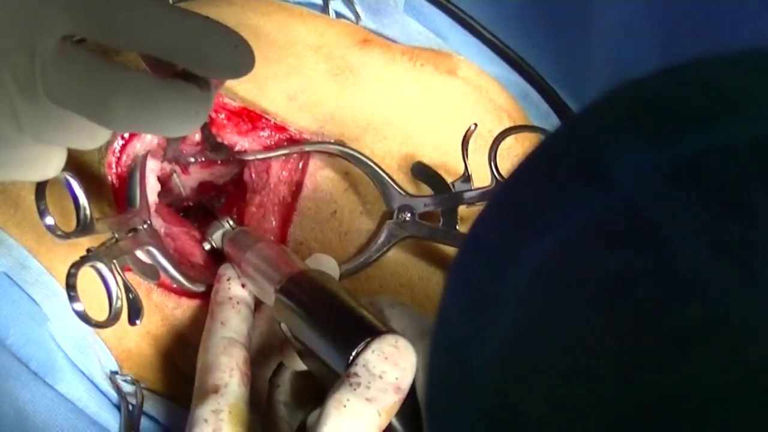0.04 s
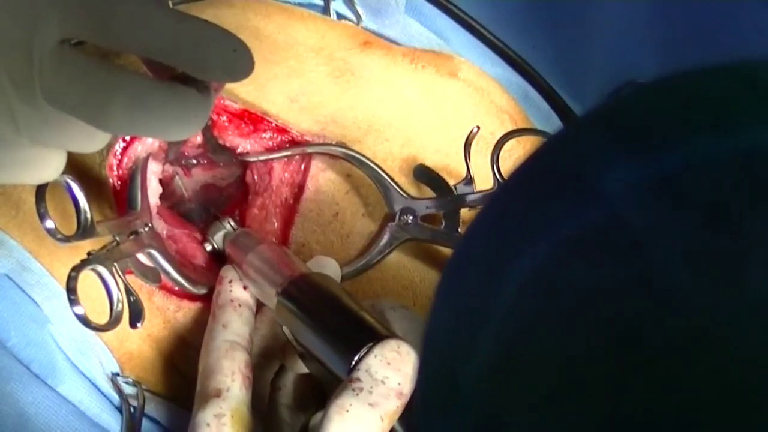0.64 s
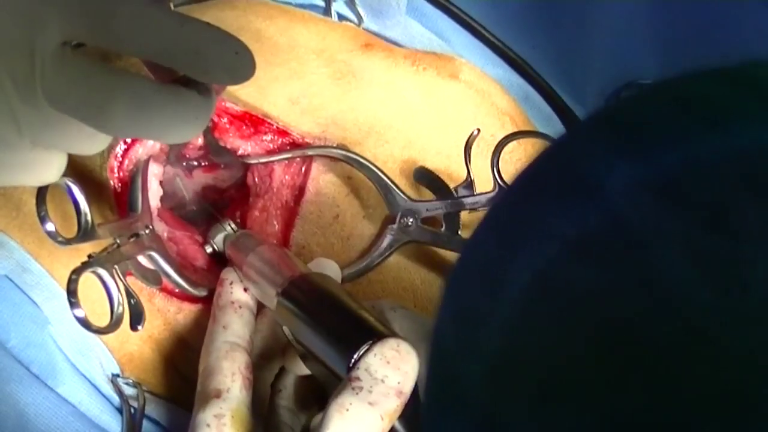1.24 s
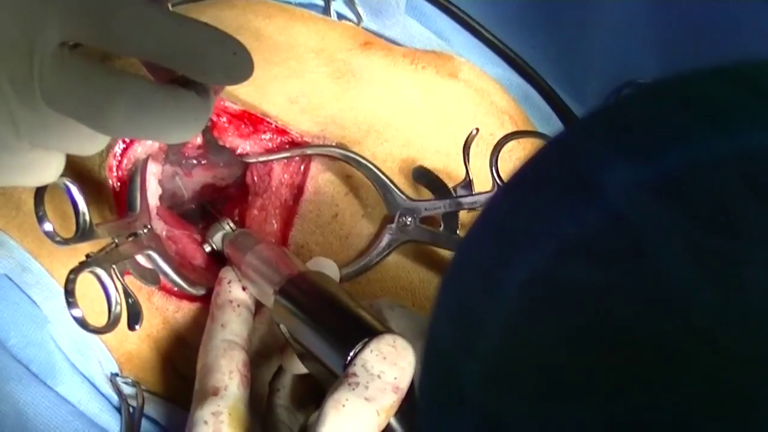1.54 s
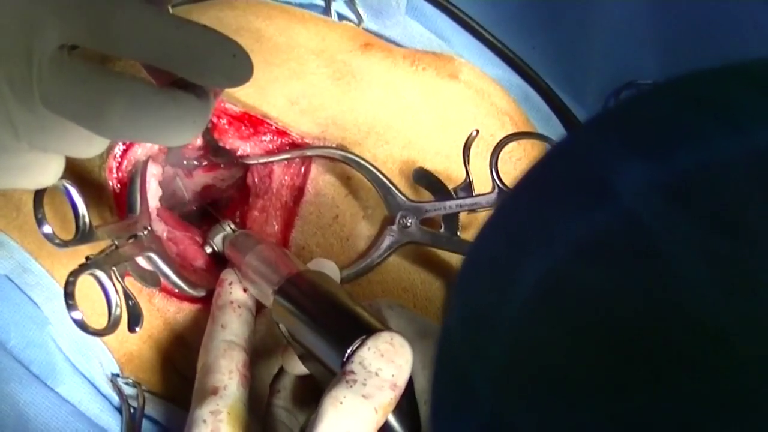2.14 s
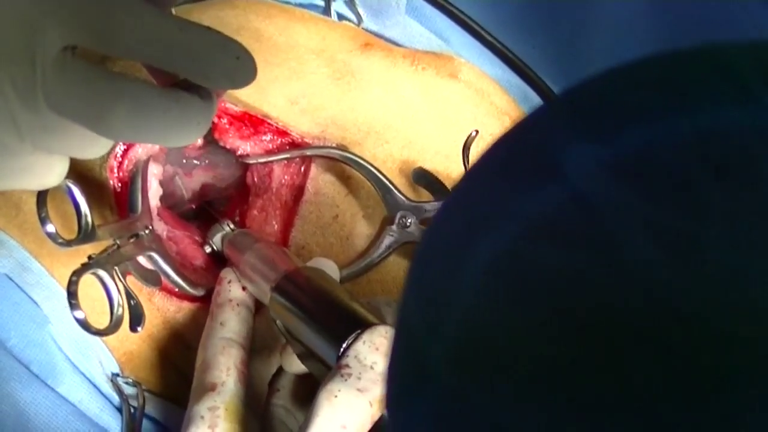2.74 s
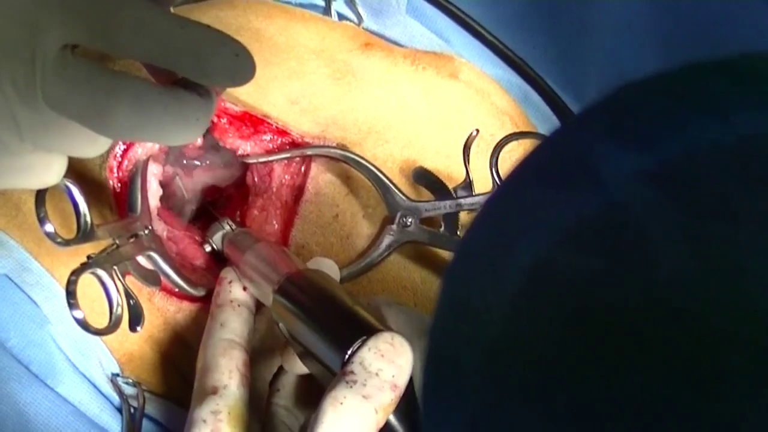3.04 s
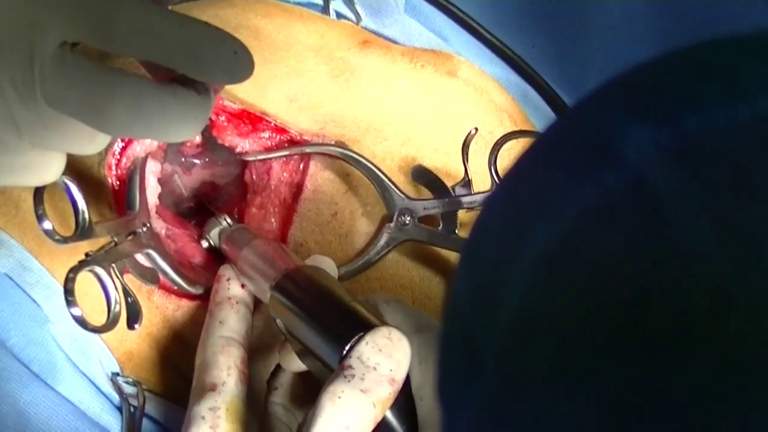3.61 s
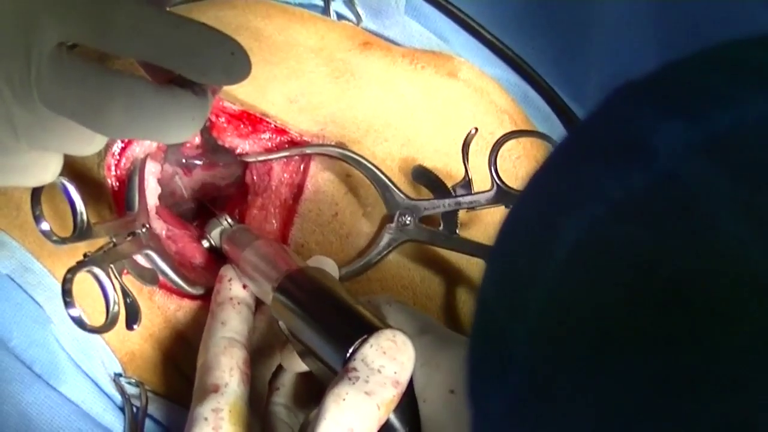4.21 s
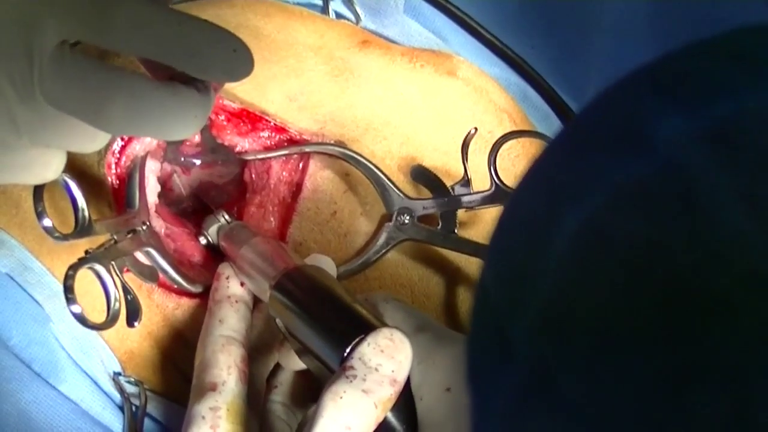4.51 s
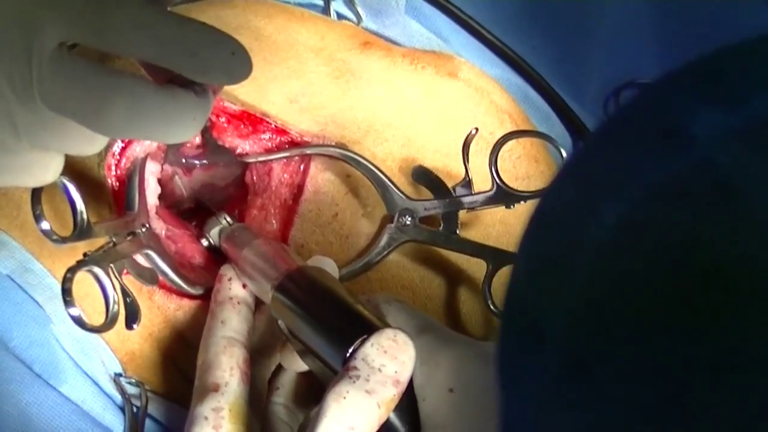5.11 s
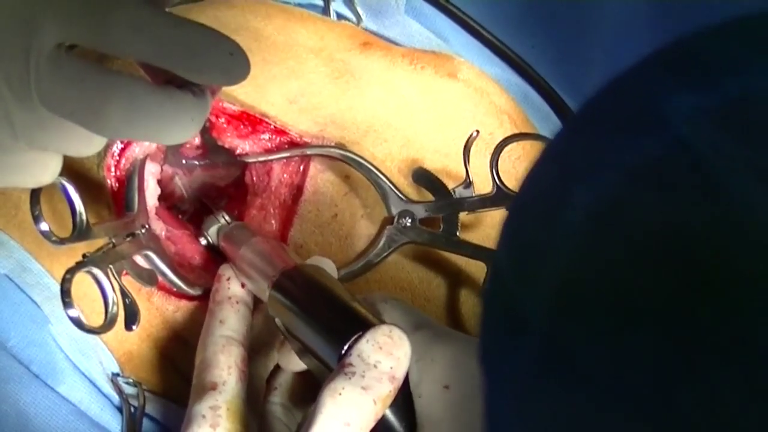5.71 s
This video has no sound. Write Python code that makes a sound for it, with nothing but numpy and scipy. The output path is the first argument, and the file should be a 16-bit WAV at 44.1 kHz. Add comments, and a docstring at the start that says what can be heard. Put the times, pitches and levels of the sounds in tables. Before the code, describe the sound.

An oscillating surgical saw cuts bone with a steady, hissing rasp and a high whine that swells about once a second.

```python
"""An oscillating surgical saw cuts bone in an operating room.
From the start the blade swings at a steady speed and rasps, over a faint hum and airy suction whistles.
About once a second it is pressed in: as the pressure builds the handpiece drones, the teeth squeal,
the cut whines and at last the flexing blade rings. Near 3.5 s something hollow is bumped softly;
a few scuffs follow. At 4.8 s the teeth catch briefly."""
import sys
import numpy as np
from scipy import signal
from scipy.fft import rfft, irfft
from scipy.io import wavfile
from scipy.ndimage import uniform_filter1d

SR = 44100
rng = np.random.default_rng(int(sys.argv[2]) if len(sys.argv) > 2 else 0)


def put_to_file(sound):
    """Save the sound as 16-bit audio at rate SR, in the file named by the first command-line argument."""
    columns = np.atleast_2d(sound).T  # one column per channel
    safe = np.clip(columns, -1, 1)
    whole_steps = np.round(safe * 32767)
    wavfile.write(sys.argv[1], SR, whole_steps.astype(np.int16))


N = 253910
T = np.arange(N) / SR
HZ = np.fft.rfftfreq(N, 1 / SR)

# pushes into the bone: (start [s], build [s], hold [s], ease [s],
# drone [dB], octave [dB], whine [dB], flex [dB], glide before the push [dB])
PUSHES = [(-.283, 0.31, 0.2, 0.11, -4.5, 0.8, 0, 2, 12), (.7, .37, 0.096, 0.18, 1.4, 1.2, 2.5, 1.5, -6),
          (1.529, 0.2, 0.15, 0.042, 1, -0.5, 0.5, 3, 6), (2.685, 0.24, 0.13, 0.1, .3, 7.3, 1, 6, 1.3),
          (3.368, 0.391, 0.17, 0.089, 0, 5.5, 3, 2, -1.4), (4.23, 0.48, 0.086, 0.12, 3.3, 3, 2.5, 2, 2),
          (5.04, 0.52, .3, .13, 2.4, 4, 1.5, 4, 3.5)]


def gain_of(db):
    """Decibels to amplitude."""
    return 10 ** (np.asarray(db) / 20)


def unit_rms(x):
    """Scales to an rms of one."""
    return x / np.sqrt(np.mean(abs(x) ** 2) + 1e-20)


def levelled(x, window_samples=4000):
    """Holds the running rms of a stereo sound at one."""
    return x / np.sqrt(uniform_filter1d(np.mean(x ** 2, axis=0), window_samples) + 1e-20)


def colour(points):
    """Gain per frequency bin from (frequency [Hz], level [dB]) points."""
    hz, db = np.transpose(points)
    return gain_of(np.interp(np.log(HZ + 1), np.log(hz), db))


def noise(points):
    """Coloured noise, unit rms."""
    return unit_rms(irfft(rfft(rng.standard_normal(N)) * colour(points), N))


def drift(hz, count=8192):
    """Random wavering up to about hz, unit rms."""
    low_pass = 1 / (1 + (np.arange(count // 2 + 1) / T[-1] / hz) ** 4)
    slow = unit_rms(irfft(rfft(rng.standard_normal(count)) * low_pass))
    return np.interp(T, np.linspace(0, T[-1], count), slow)


def swell_db(points):
    """Level curve about its mean."""
    level_db = np.interp(T, *np.transpose(points))
    return level_db - np.mean(level_db)


def panned(x, balance_db):
    """Mono to stereo; positive is left."""
    return np.array([x * gain_of(balance_db / 2), x * gain_of(-balance_db / 2)])


def resonance(spectrum, hz, width_hz):
    """Sound of a spectrum passed through one resonance."""
    return irfft(spectrum / (1 + ((HZ - hz) / (0.35 * width_hz)) ** 2), N)


def bursts(rows, points):
    """Noise bursts with exponential rise and decay."""
    envelope = sum(gain_of(db) * np.exp(np.minimum((T - peak_s) / rise_s, (peak_s - T) / decay_s))
                   for peak_s, db, rise_s, decay_s in rows)
    return envelope * noise(points)


def fuzzy_glides(rows, width_hz, waver_db, fade_s=0.045):
    """Narrow noise bands that glide and waver."""
    out = np.zeros(N)
    for start_s, length_s, first_hz, last_hz, db in rows:
        end_s = start_s + length_s
        pitch_hz = np.interp(T, [start_s, end_s], [first_hz, last_hz])
        carrier = np.exp(2j * np.pi * np.cumsum(pitch_hz) / SR)
        band = ((drift(width_hz) + 1j * drift(width_hz)) * carrier).real
        envelope = np.clip(np.minimum(T - start_s, end_s - T) / fade_s, 0, 1)
        out += unit_rms(band * gain_of(waver_db * drift(7))) * gain_of(db) * envelope
    return out


def room(air_db=-91, throb_db=2.5, throb_hz=8, mute_db=-22):
    """Low air noise and two beating hums throb unevenly."""
    # air spectrum: (frequency [Hz], relative level [dB])
    air = [(20, -17), (50, 30.5), (85, -10), (110, 21.5), (150, 30), (250, -43), (450, -15), (650, -45),
           (850, -18), (1250, -12), (4000, -50)]
    # hums: (frequency [Hz], level [dB])
    hums = [(100, -76), (86.7, -77.5)]
    # brief mutes applied to this layer's gain: (middle [s], half length [s])
    mutes = [(0.5, 0.033), (0.724, 0.042), (1.31, .05), (1.457, 0.044), (2.007, 0.066), (4.02, 0.062)]
    mute = sum(np.exp(-((T - middle_s) / half_s) ** 4) for middle_s, half_s in mutes)
    gain = unit_rms(gain_of(throb_db * np.minimum(drift(throb_hz), 1) + mute_db * mute))
    hum = sum(gain_of(db) * unit_rms(np.sin(2 * np.pi * (hz * T + 0.07 * drift(9.9))))
              for hz, db in hums)
    return gain * (hum + gain_of(air_db) * noise(air))


def suction():
    """Air drawn through a tube whistles faintly."""
    # whistles: (start [s], length [s], first pitch [Hz], last pitch [Hz], level [dB])
    whistles = [(0.315, 0.18, 612, 612, -66), (0.584, 0.84, 710, 588, -67.5), (1.5, 0.17, 608, 590, -65.5),
                (1.952, 0.35, 642, 676, -70), (2.723, 0.091, 806, 800, -76), (2.885, 0.19, 665, 683, -72.5),
                (3.63, 0.192, 660, 640, -68), (4.382, 0.17, 660, 684, -72.5), (5.09, 0.14, 640, 710, -69.5)]
    return fuzzy_glides(whistles, width_hz=35, waver_db=4)


def bump():
    """A dull thud whose main blow rings a hollow body, then soft scuffs."""
    # blows: (time [s], level [dB], rise constant [s], decay constant [s])
    blows = [(3.435, -61, .01, 0.025), (3.476, -48, 0.0093, 0.043), (3.545, -57, 0.0069, 0.045)]
    # thud spectrum: (frequency [Hz], relative level [dB])
    thud = [(30, -44), (55, -22), (90, -11), (160, 1), (215, -2), (280, -1), (350, -6), (600, -8),
            (900, -14), (1400, -16), (2500, -25), (6000, -38)]
    # hollow body: (frequency [Hz], level [dB], t60 [s])
    modes = [(284, -48, 0.41), (447, -51, 0.22), (630, -58, .35), (796, -59, 0.35)]
    # scuffs: (start [s], length [s], first pitch [Hz], last pitch [Hz], level [dB])
    scuffs = [(3.89, 0.075, 413, 355, -65), (3.99, .1, 380, 330, -74.5), (4.39, 0.082, 410, 407, -71)]
    age_s = np.maximum(T - blows[1][0], 0)
    ring = sum(gain_of(db - 60 * age_s / t60_s) * np.sin(2 * np.pi * hz * age_s)
               for hz, db, t60_s in modes)
    return bursts(blows, thud) + ring + fuzzy_glides(scuffs, width_hz=32, waver_db=3)


def teeth_catch():
    """The teeth catch briefly in the bone."""
    # catch: (time [s], level [dB], rise constant [s], decay constant [s])
    catches = [(4.83, -48, 0.015, 0.014)]
    # its spectrum: (frequency [Hz], relative level [dB])
    spectrum = [(300, -55), (620, -28), (780, -10), (920, -26), (1300, -13), (1750, -30), (1880, -14),
                (2000, 7), (2160, -14), (3500, -16), (5000, -28), (9000, -50)]
    return bursts(catches, spectrum)


def pressure():
    """Blade pressure on the bone, 0-1: each push builds, holds and eases off."""
    ramps = [np.minimum((T - start_s) / build_s, 1 - (T - start_s - build_s - hold_s) / ease_s)
             for start_s, build_s, hold_s, ease_s, *_ in PUSHES]
    return np.clip(np.max(ramps, axis=0), 0, 1)


def engaged(press, half_at, width):
    """Soft step in pressure, 0-1: how far a voice has set in."""
    return 0.5 + 0.5 * np.tanh((press - half_at) / width)


def ringing_steel(load):
    """Friction rings blade and handpiece; resonances come and go as the blade shifts in the cut."""
    # contour of the blade's high ring: (time [s], level before scaling [dB])
    contour = [(0.0, -52.5), (1.25, -56.5), (1.3, -50), (1.49, -53.5), (2.69, -53), (3.05, -57.5),
               (3.11, -51.5), (3.56, -59.5), (4.01, -53.5), (4.67, -56.5), (5.07, -52.5), (5.12, -58),
               (5.44, -53), (5.76, -58)]
    # handpiece: (frequency [Hz], width [Hz], relative level [dB], change under load [dB])
    modes = [(1070, 70, -24, 4), (1185, 70, -17, -1), (1265, 90, -16.5, 0), (1400, 110, -15, 1),
             (1590, 100, -19, 4), (1665, 60, -19, -3), (1905, 70, -13.5, -3), (1980, 100, -7, 0),
             (2200, 120, -16, -3), (2400, 200, -13, 1), (2800, 350, -10, 0), (3640, 220, -2.5, -1.5),
             (4020, 160, -5, -1), (4410, 190, 1.7, -4.2), (4700, 200, -1, 0), (4900, 180, -3, -1),
             (5190, 200, 2.2, -3.2), (5450, 140, -5, -1), (5580, 140, -2, 1), (5900, 180, -6.5, 0),
             (7080, 450, -2, -1.5), (10100, 700, -3.5, 0), (11850, 1000, -4, -.5), (13500, 1200, -3.5, -.5),
             (15150, 550, -8, 0)]
    friction = rfft(rng.standard_normal(N))
    steel = resonance(friction, hz=8630, width_hz=710) * gain_of(-2 + 1.66 * swell_db(contour))
    for hz, width_hz, db, load_db in modes:
        wander_db = 4 / (1 + width_hz / 450) * drift(5.5)  # narrow ones wander most
        steel += resonance(friction, hz, width_hz) * gain_of(db + load_db * load + wander_db)
    return steel


def patchy(x, depth_db=7, below_hz=2940, patch_hz=80, patch_s=0.05):
    """Random narrow-band flicker makes the low rasp gritty."""
    hz, times_s, bins = signal.stft(x, SR, nperseg=1024, noverlap=768)
    patches = rng.standard_normal(bins.shape[1:])
    for axis, span in enumerate((patch_hz / hz[1], patch_s / times_s[1])):
        patches = uniform_filter1d(patches, max(round(span), 1), axis)
    gain = gain_of(depth_db * np.clip(unit_rms(patches), -3, 1) / (1 + (hz[:, None] / below_hz) ** 4))
    gain /= np.sqrt(np.mean(gain ** 2, axis=1, keepdims=True))
    return signal.istft(bins * gain, SR, nperseg=1024, noverlap=768)[1][:, :N]


def rasp(turns, load, low_hz=926, split_hz=7000, top_hz=12800, body_db=-44, fizz_db=-42.5):
    """Friction noise from the steel, scattered by the room and pulsing with the strokes."""
    # scattered hiss: (frequency [Hz], relative level [dB])
    scatter = [(300, -65), (850, -81), (1250, -38.5), (1550, -6), (1750, -34), (2500, -11), (3250, -8.5),
               (3800, -4.5), (4900, -2), (6350, -3.5), (6900, -2.5), (9000, -4), (12800, -4), (14200, -9),
               (16000, -10)]
    # treble fizz: (time [s], relative level [dB])
    fizz_contour = [(0.0, -43.5), (0.58, -42.5), (1.25, -44), (1.3, -43.5), (1.59, -43.5), (1.6, -45),
                    (1.79, -42), (1.81, -44), (1.97, -43), (2.76, -43), (2.79, -44.5), (3.08, -44),
                    (3.1, -42.5), (3.35, -43), (3.57, -45.5), (4.09, -43), (4.71, -45.5), (4.97, -42.5),
                    (5.24, -44.5), (5.32, -47), (5.37, -44.5), (5.74, -45), (5.76, -44)]
    # body of the rasp: (time [s], relative level [dB])
    body_contour = [(0.0, -43.5), (2.43, -44.5), (2.56, -43), (3.97, -43), (4.03, -45), (4.62, -42),
                    (4.97, -44), (5.6, -42.5), (5.7, -43)]
    spectrum = rfft(ringing_steel(load)) + colour(scatter) * rfft(rng.standard_normal((2, N)))
    high_pass = 1 / (1 + (low_hz / (HZ + 1)) ** 20)  # keeps the rasp thin
    high = 1 / (1 + (split_hz / (HZ + 1)) ** 8)
    top = 1 / (1 + (top_hz / (HZ + 1)) ** 20)
    damping = gain_of(-1.5 * (load - np.mean(load)))  # pressing in damps the very top
    fizz = irfft(spectrum * high * (1 - top), N) + irfft(spectrum * top, N) * damping
    fizz = levelled(fizz) * gain_of(fizz_db - 0.56 * load + swell_db(fizz_contour))
    body = patchy(irfft(spectrum * (1 - high) * high_pass, N))
    body = levelled(body) * gain_of(body_db + 0.94 * swell_db(body_contour))
    angle = 2 * np.pi * turns
    strokes = 1 + 0.023 * np.cos(angle) + 0.046 * np.cos(2 * angle) + 0.01 * np.cos(3 * angle)
    flutter = gain_of(0.54 * drift(22))
    return panned(strokes * flutter, balance_db=0.51) * (body + fizz)


def surge(multiple):
    """Amplitude of a harmonic's surges as the teeth lock on to it."""
    # surges: (middle [s], half length [s], multiple, level [dB])
    surges = [(.96, 0.027, 9, -51), (1.005, .04, 11, -49), (1.127, 0.054, 10, -55), (2.853, 0.041, 11, -59),
              (3.01, 0.055, 9, -50), (3.64, 0.025, 11, -48), (3.78, .06, 11, -51.5), (3.86, 0.041, 9, -53),
              (3.952, 0.012, 10, -41.5), (4.513, 0.034, 7, -50), (4.547, 0.16, 11, -54),
              (4.58, 0.045, 9, -50), (5.6, 0.17, 10, -52)]
    return sum(gain_of(db) * np.exp(-((T - middle_s) / half_s) ** 2)
               for middle_s, half_s, locked, db in surges if round(locked) == round(multiple))


def voice(turns, harmonics, drive_db, chatter_hz=36, shake_hz=24):
    """Harmonics of the swing: each a clean line plus a fuzzy skirt from the chatter of the teeth."""
    shake = np.sin(2 * np.pi * (shake_hz * T + 0.23 * drift(1)))  # the handpiece trembles in the grip
    tremor = gain_of(0.5 * shake + 0.35 * drift(12))
    sides = np.array([[1j], [-1j]])
    out = np.zeros((2, N))
    for multiple, db, follow, roughness, balance_db, lead_rad in harmonics:
        carrier = np.exp(2j * np.pi * (round(multiple) * turns + rng.random()) + sides * lead_rad / 2)
        skirt = np.clip(roughness * gain_of(-0.2 * drive_db), 0, 0.85)  # a loose blade rattles more
        skirt_hz = chatter_hz * multiple ** 0.06
        chatter = unit_rms(drift(skirt_hz) + 1j * drift(skirt_hz))
        reflections = 0.2 * drift(skirt_hz) * sides
        level = gain_of(db + follow * drive_db) / np.hypot(1 - skirt, skirt)
        line = np.hypot(level * (1 - skirt), surge(multiple))
        envelope = line + level * skirt * (chatter + reflections)
        out += np.sqrt(2) * (envelope * carrier).real * panned(tremor, balance_db)
    return out


def drive(share, pressed_db, gliding_db, unsteady_db=2.2, unsteady_hz=9.6):
    """Drive in dB: full when pressed in, unsteady while the gliding blade touches unevenly."""
    return share * pressed_db + (1 - share) * (gliding_db + unsteady_db * drift(unsteady_hz))


def saw_tones(turns, press, load):
    """Drone, octave, whine, flex and squeal, each setting in at its own pressure."""
    # handpiece drone: (multiple before rounding, level at 0 dB drive [dB], drive slope [dB/dB],
    # roughness [0-1], left-right balance [dB], left lead [rad])
    drone = [(1, -59, 1, 0.31, -2, -0.44)]
    # its octave: same columns
    octave = [(2.2, -60.5, 1.07, 0.27, -1.7, 1)]
    # whine of the cut: same columns
    whine = [(3, -50.5, 0.99, 0.19, -0.5, 0.3), (4, -58.5, 0.32, 0.35, 0, -0.078)]
    # flexing blade: same columns
    flex = [(5, -50.5, 0.88, 0.27, 5.9, .28), (6, -64, 0.25, 1, 3.8, 0.17),
            (7, -55.5, 0.45, 0.43, 3.1, 0.077), (17, -67.5, 0.24, .85, 1.6, .07)]
    # squealing teeth: same columns
    squeal = [(8, -64, 1.3, 0.33, -3, .05), (9, -52.5, 1.6, 0.49, -0.5, -0.18),
              (10, -55, 1.1, 0.49, 6, -0.13), (11, -50.5, 3.5, 0.39, 0.5, .06),
              (12, -68, 1.1, .25, 0, -0.036), (13, -58.5, 2, .9, -7.5, -0.097)]
    start_s, build_s, hold_s, _, *strengths_db, glides_db = np.transpose(PUSHES)
    edges_s = np.ravel([start_s, start_s + build_s + hold_s], order="F")
    drone_db, octave_db, whine_db, flex_db = (np.interp(T, edges_s, np.repeat(db, 2))
                                              for db in strengths_db)
    glide_db = np.interp(T, start_s, glides_db)
    grip = np.exp(-((press - 0.58) / 0.3) ** 2)  # near half pressure the teeth grip and still the blade
    out = voice(turns, drone, drive(load, drone_db, glide_db - 19.5))
    out += voice(turns, octave, drive(engaged(press, 0.46, 0.35), octave_db, glide_db - 13.5))
    out += voice(turns, whine, drive(engaged(press, 0.56, 0.22), whine_db, glide_db - 14))
    out += voice(turns, flex, drive(engaged(press, 0.8, 0.15), flex_db, -10) - 5.5 * grip)
    return out + voice(turns, squeal, drive_db=-3.5 + 1.9 * grip + 0.9 * press)


def scene(blade_hz=505.9, wobble=0.00027):
    """The saw, with a slight speed wobble, over bump, suction and room."""
    turns = np.cumsum(blade_hz * (1 + wobble * drift(7.5))) / SR
    press = pressure()
    load = engaged(press, half_at=0.25, width=0.23)
    saw = saw_tones(turns, press, load) + rasp(turns, load) + teeth_catch()
    return saw + bump() + suction() + room()


def record(dry):
    """Steep low-pass at 15760 Hz."""
    low_pass = signal.firwin(1023, 15760, window=("kaiser", 9), fs=SR)
    return signal.oaconvolve(dry, low_pass[None], "same")


dry = scene()
out = record(dry)
put_to_file(out)
```